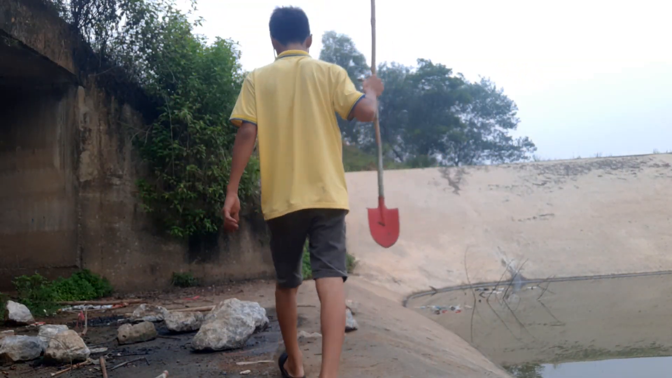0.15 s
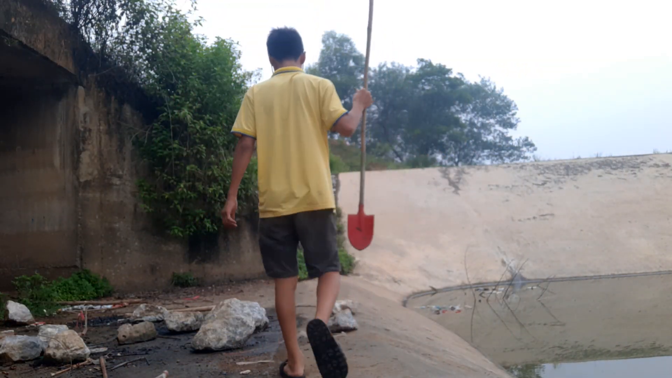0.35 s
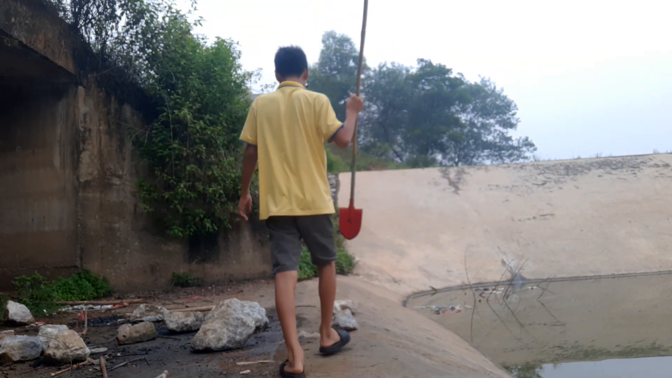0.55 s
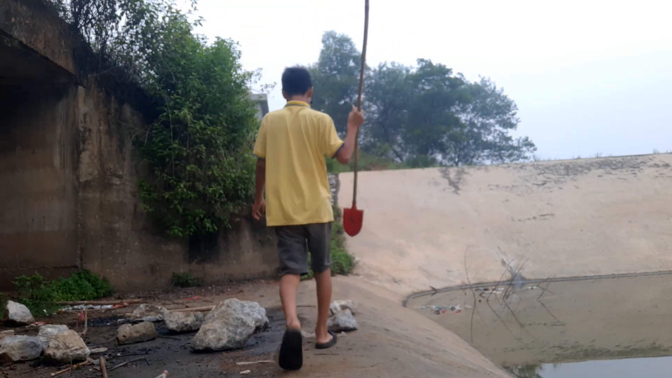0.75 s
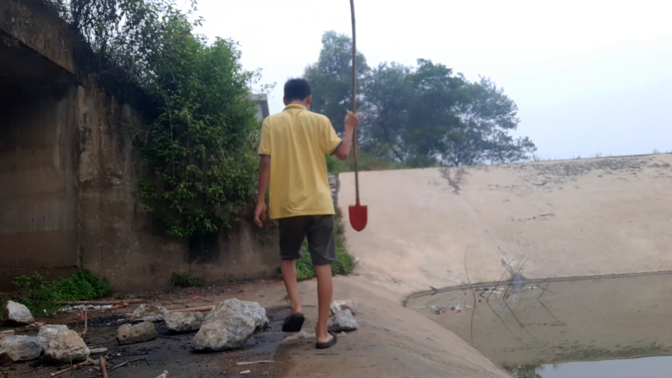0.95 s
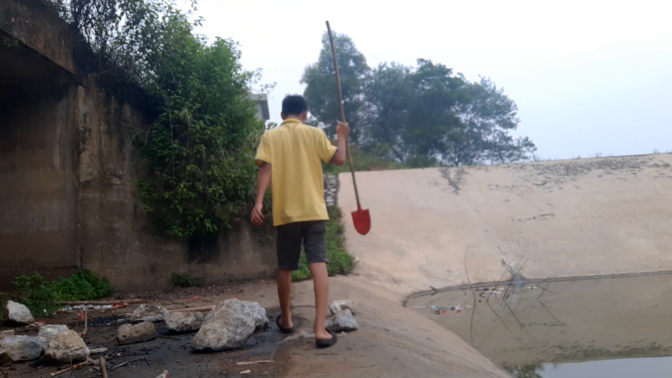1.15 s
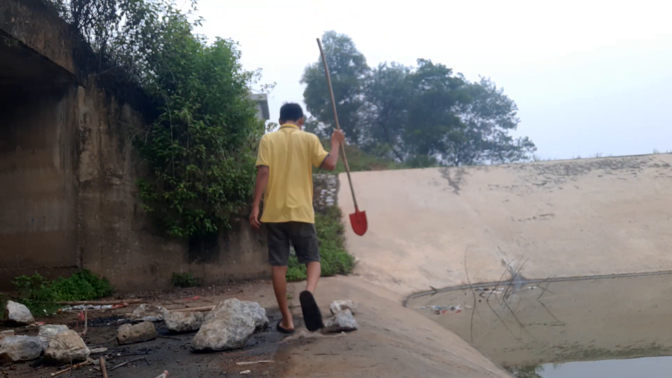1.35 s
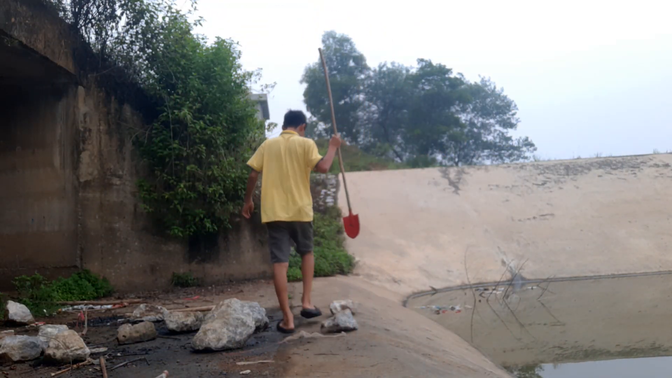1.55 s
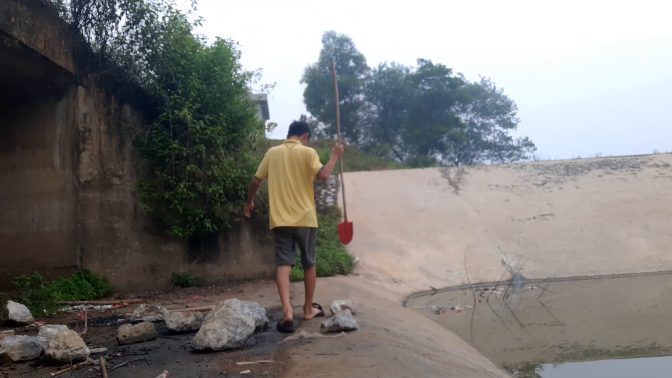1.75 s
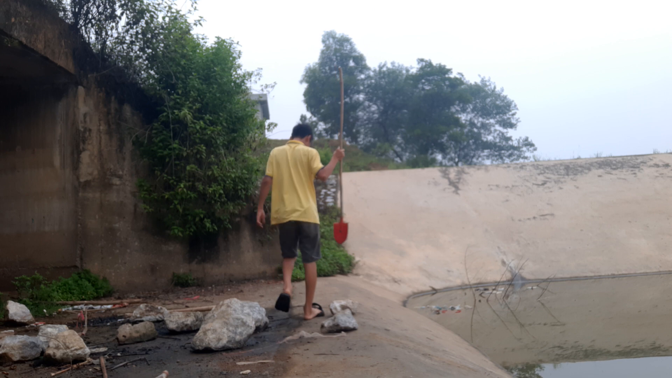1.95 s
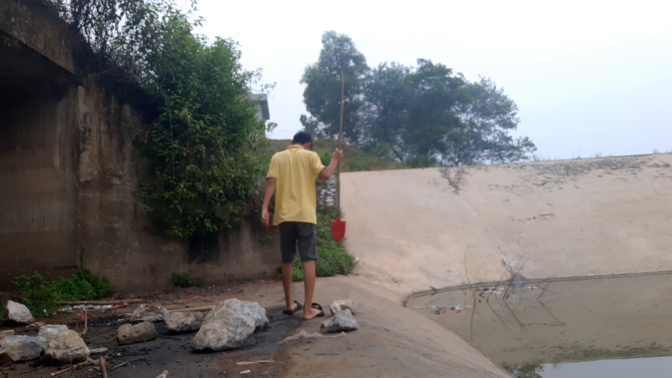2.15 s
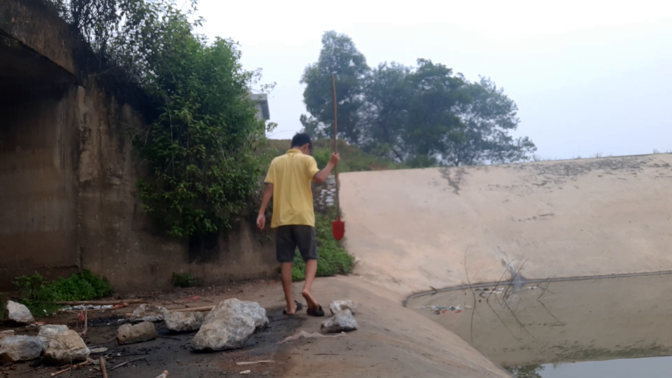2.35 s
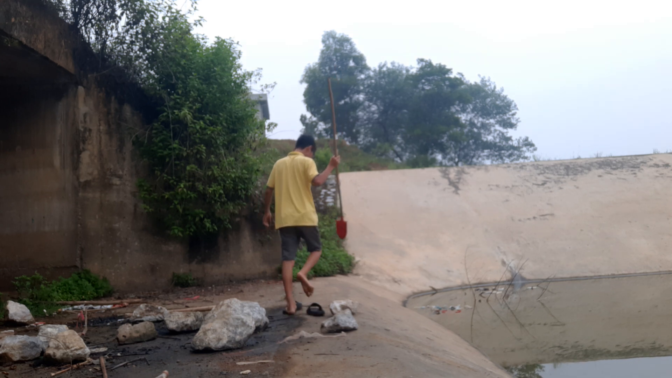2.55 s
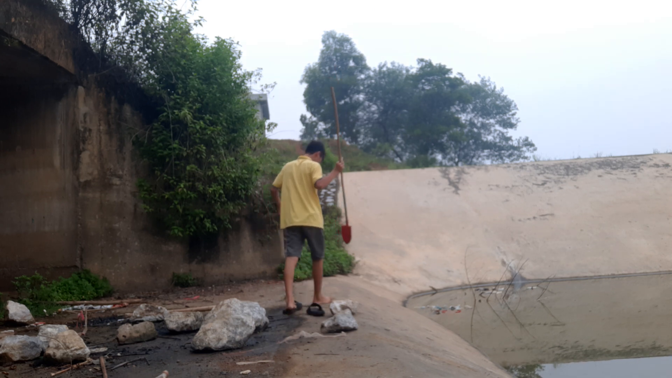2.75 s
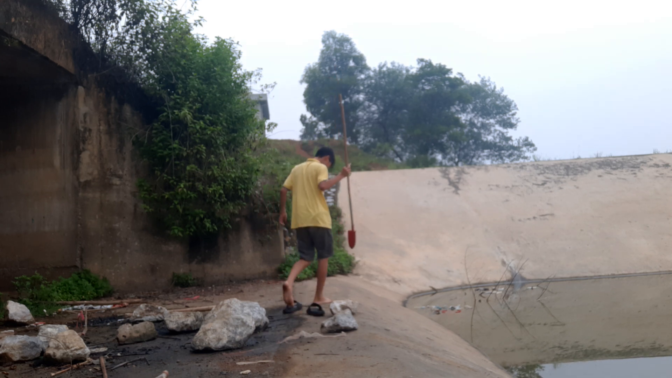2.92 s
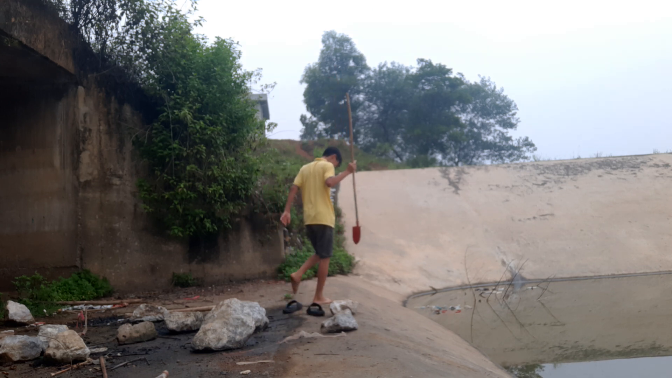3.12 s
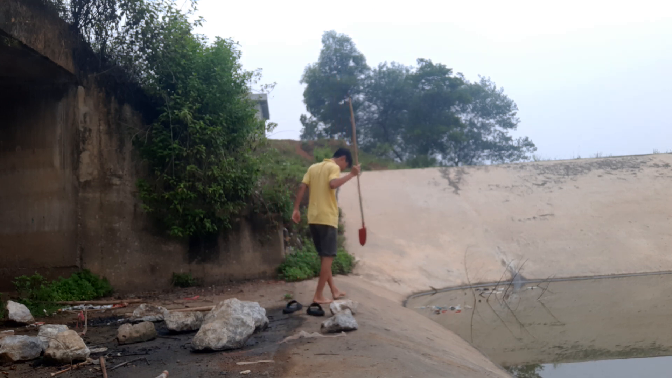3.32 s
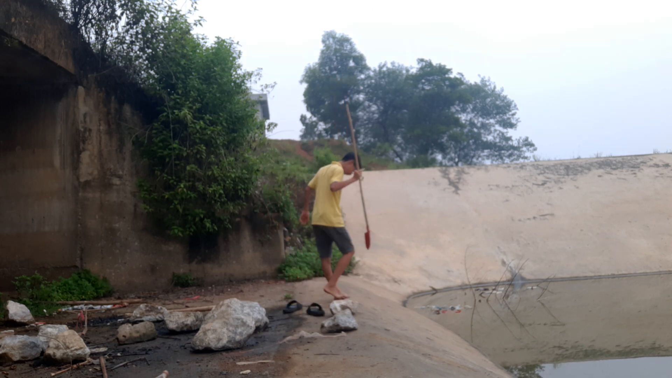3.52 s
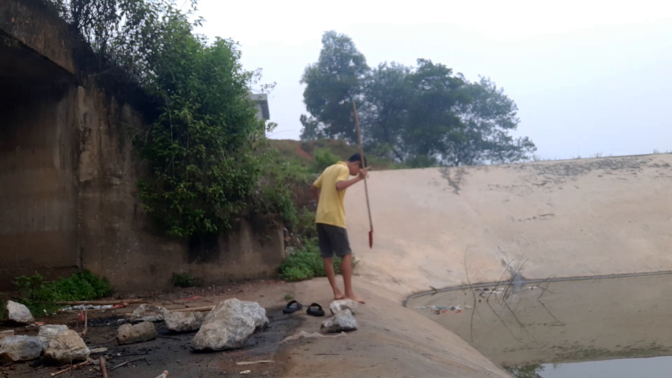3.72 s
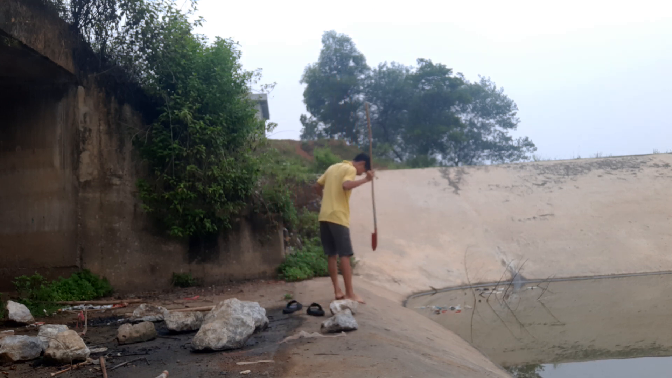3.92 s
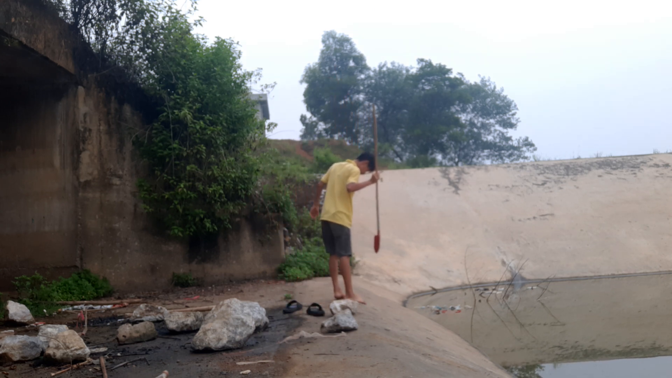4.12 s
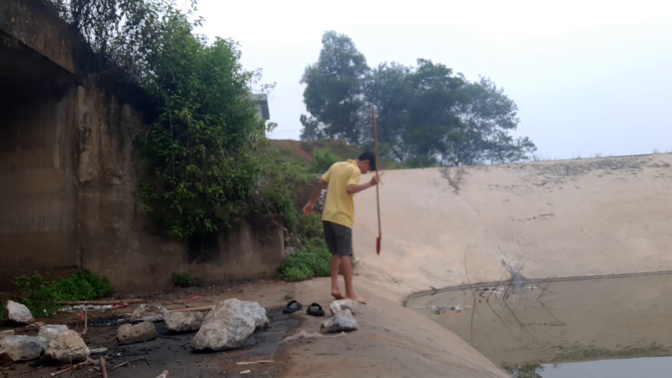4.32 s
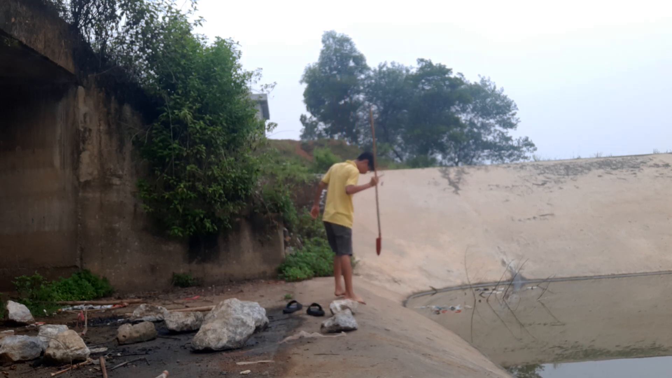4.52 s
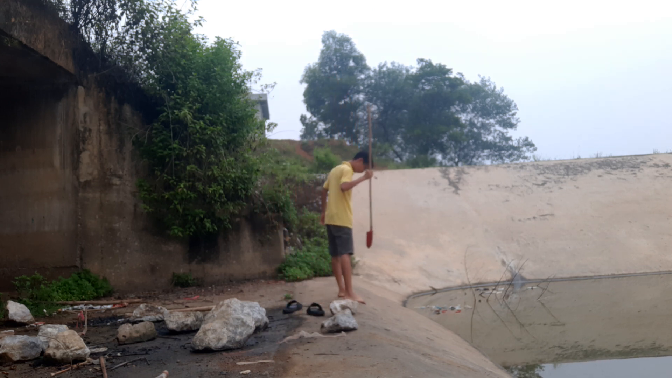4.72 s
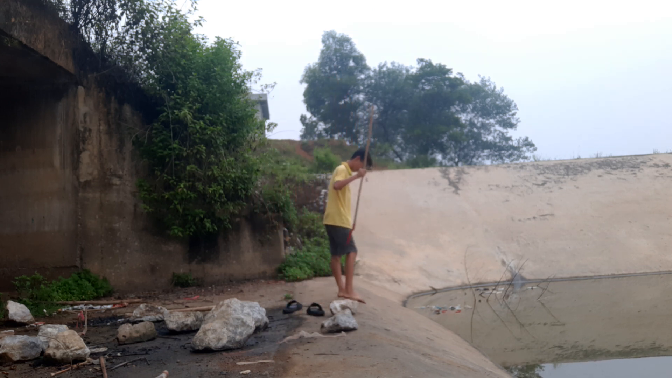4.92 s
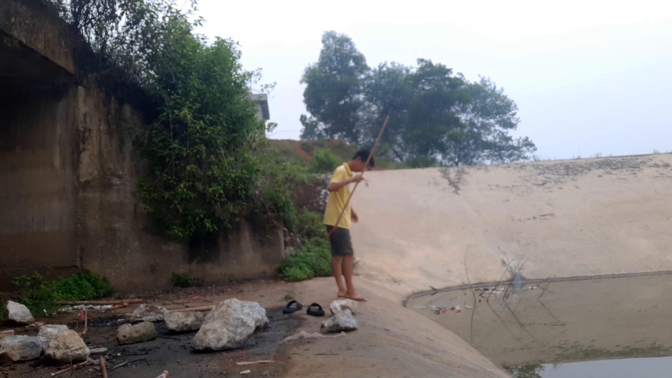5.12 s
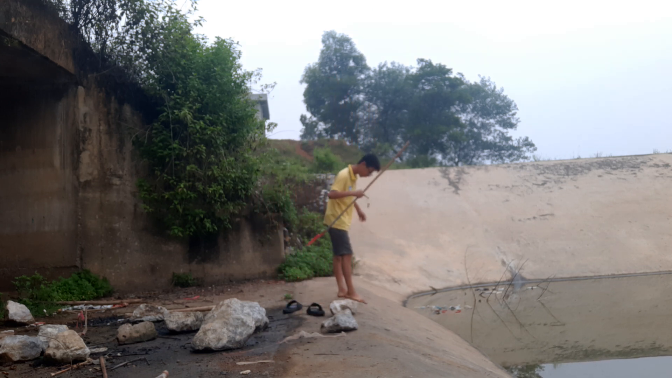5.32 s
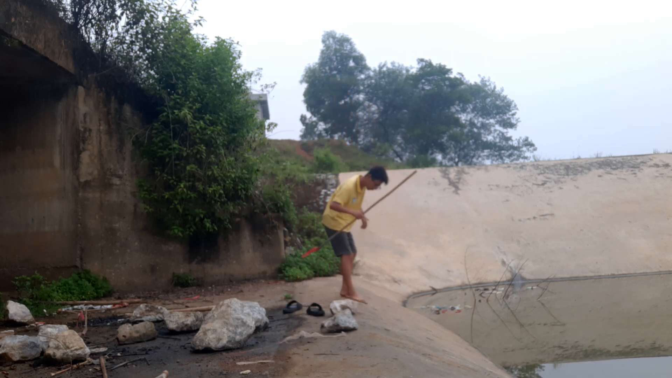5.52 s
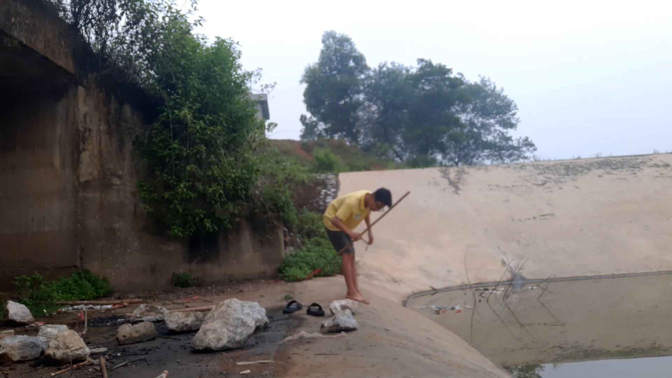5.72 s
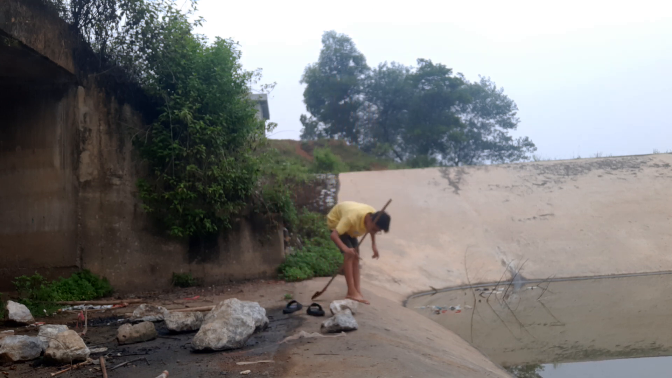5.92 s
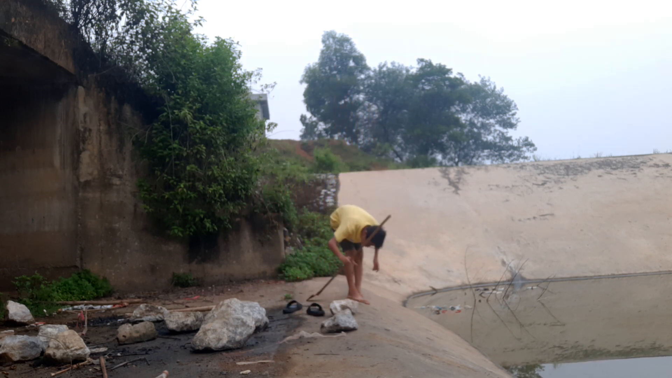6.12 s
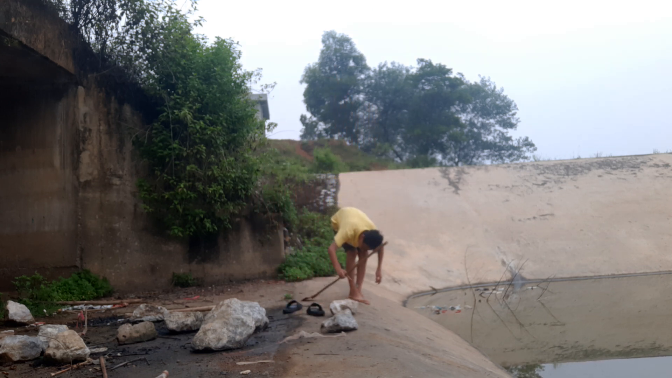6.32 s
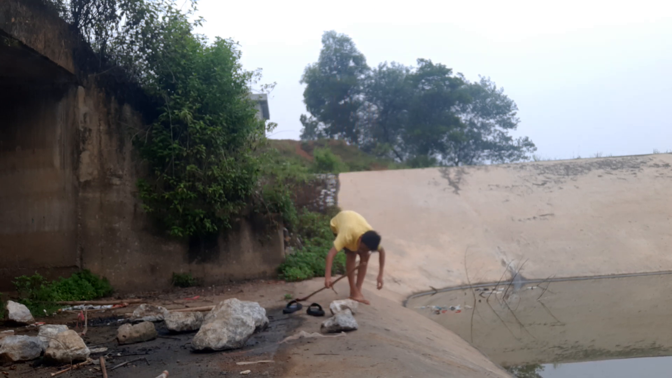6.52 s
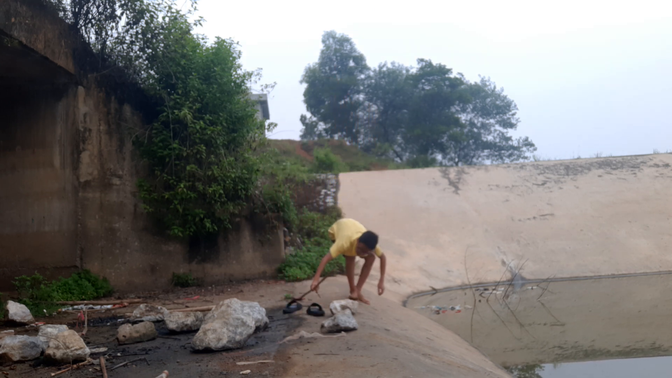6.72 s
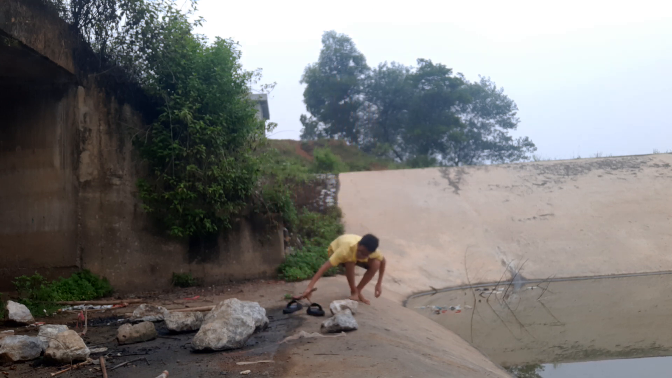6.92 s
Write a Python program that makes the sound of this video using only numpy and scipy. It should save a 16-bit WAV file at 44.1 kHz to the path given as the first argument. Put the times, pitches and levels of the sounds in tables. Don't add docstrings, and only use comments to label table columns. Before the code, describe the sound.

Stereo phone pickup with slightly mismatched sides and light hiss. Close gritty sandal steps come first, with pebble clicks, slaps and soft heel thumps, under clear descending bird whistles and steady cricket chirps. A quieter stretch follows, broken by a single hollow wood knock with tiny bounces. Then a shovel blade strikes concrete and drags in harsh, bright, ringing strokes, with short echoes from wall and slope.

```python
import sys
import numpy as np
from scipy import signal
from scipy.io import wavfile
from scipy.ndimage import uniform_filter1d

SR = 44100
rng = np.random.default_rng(int(sys.argv[2]) if len(sys.argv) > 2 else 0)


def volts_from_decibels(level):
    exponent = np.asarray(level, float) / 20
    return 10 ** exponent


def unload_audio(sound):
    columns = np.transpose(np.atleast_2d(sound))
    steps = np.round(np.clip(columns, -1, 1) * 32767)
    wavfile.write(sys.argv[1], SR, steps.astype(np.int16))


N = 311787


def evened(x):
    return x / np.sqrt(np.mean(x ** 2) + 1e-20)


def add(mix, start_s, sound):
    part = mix[round(start_s * SR):][:len(sound)]
    part += sound[:len(part)]


def lumps(count, hz, depth_db):
    drift = signal.lfilter([1], [1, -np.exp(-2 * np.pi * hz / SR)], rng.standard_normal(count))
    return volts_from_decibels(depth_db * evened(drift))


def ring(x, modes, widen=1, wander_db=0):
    out = np.zeros(len(x))
    for k, (hz, width_hz, db) in enumerate(modes):
        r = np.exp(-np.pi * width_hz * widen / SR)
        turn = 2 * np.pi * hz / SR
        drive = x * evened(lumps(len(x), 7.8, wander_db)) if wander_db else x
        mode = signal.lfilter([1 - r, 0, r - 1], [1, -2 * r * np.cos(turn), r * r], drive)
        out += (-1) ** k * volts_from_decibels(db) * mode
    return out


def grit(count, per_s, spread_db, smooth):
    size = volts_from_decibels(spread_db * np.minimum(rng.exponential(1, count), 4)) * rng.choice([-1, 1], count)
    snaps = size * (rng.random(count) < per_s / SR)
    return evened(snaps) + smooth * rng.standard_normal(count)


def swell(t, peak_s, rise_s, fall_s):
    away = np.where(t < peak_s, (peak_s - t) / rise_s, (t - peak_s) / fall_s)
    return volts_from_decibels(-23 * away ** 1.484)


def taps(rows, modes, t60):
    out, t = np.zeros(N), np.arange(3000) / SR
    for (s, db), puff in zip(rows, rng.standard_normal((len(rows), 3000))):
        tap = ring(ring(puff * volts_from_decibels(-60 * t / t60), modes), modes)
        add(out, s - .001, volts_from_decibels(db) * tap / abs(tap).max())
    return out


def pings(rows, t60):
    out, t = np.zeros(N), np.arange(8000) / SR
    for (s, hz, db), turn in zip(rows, rng.random((len(rows), 1))):
        rise = np.minimum(t / 0.0011, 1)
        add(out, s, volts_from_decibels(db - 60 * t / t60) * rise * np.sin(2 * np.pi * (hz * t + turn)))
    return out


def wash(points, same, patchy_db):
    hz, (f, db) = np.fft.rfftfreq(1024, 1 / SR), np.transpose(points)
    a, b, c, d, patches = rng.standard_normal((N // 256 + 5, 513, 5)).T
    patches = evened(uniform_filter1d(uniform_filter1d(patches, 10, 0), 12, 1))
    left, other = a + 1j * b, c + 1j * d
    z = np.array([left, same * left + np.sqrt(1 - same ** 2) * other])
    colour_db = np.interp(np.log(hz + 1), np.log(f), db, -60, -60)[:, None]
    z *= volts_from_decibels(colour_db + patchy_db * patches)
    return evened(signal.istft(z, nperseg=1024, noverlap=768)[1][:, :N])


def yard(x, t60, gap_s):
    t = np.arange(SR // 2) / SR
    echoes = rng.choice([-1, 1], (2, len(t))) * (rng.random((2, len(t))) < 2500 / SR)
    echoes = echoes * volts_from_decibels(-60 * t / t60) * (t > gap_s)
    echoes = echoes[:, :round(1.2 * t60 * SR)]
    echoes = echoes / np.linalg.norm(echoes, axis=1)[:, None]
    return signal.oaconvolve(x[None], echoes, axes=1)[:, :N]


def scatter(x, t60, turn_s):
    phase = np.pi * np.arange(N) / SR / turn_s
    return sum(yard(x * np.cos(phase + k * np.pi / 5) ** 4, t60, gap_s=.0002) for k in range(5))


# time_s, rumble_db, tone_db
ENGINE = [(0, -55.5, -55), (1, -61.5, -58), (2.3, -61, -65.5), (3.5, -64.5, -63), (5.5, -63, -64.5),
          (6.4, -57, -56), (7.07, -61.5, -66.5)]
# pitch_hz, level_db (per Hz)
RUMBLE = [(15, -63), (25, -71), (54, -43), (92, 0.5), (123, 8), (151, -28.5), (224, -5.5), (261, -25),
          (305, -16), (555, -37.5), (1500, -41), (1950, -116), (3300, -120)]


def far_engine():
    t = np.arange(N) / SR
    time_s, *levels_db = np.transpose(ENGINE)
    rumble_db, tone_db = (np.interp(t, time_s, column) for column in levels_db)
    tones = np.zeros(N)
    for k, db in enumerate((-3, -1.5, -9), 1):
        tones += volts_from_decibels(db) * lumps(N, hz=1.44, depth_db=4.0) * np.sin(2 * np.pi * k * 122.5 / 2 * t)
    engine = volts_from_decibels(rumble_db) * wash(RUMBLE, same=0.84, patchy_db=2.5) + volts_from_decibels(tone_db) * tones
    return engine * volts_from_decibels([[.3], [-.3]])


# pitch_hz, level_db (per Hz)
CHORUS = [(2900, -21), (3450, -10.5), (4050, -11.5), (4600, -1.5), (5300, -7), (5750, -14), (6300, -8.5),
          (6800, -13), (7400, -30), (8500, -11), (9000, 2), (9600, -8.5), (10500, -1), (11500, -14),
          (12500, -15.5)]
# time_s, level_db
CHORUS_LEVEL = [(0, -64.5), (2.5, -66), (4.5, -66.5), (7.07, -68.5)]
# pitch_hz, width_hz, level_db
THIN_INSECT = [(3450, 110, 0)]
# time_s, level_db
THIN_INSECT_LEVEL = [(0, -95), (4.4, -88), (4.9, -86), (5.5, -87), (7.07, -88)]


def insect_chorus():
    t = np.arange(N) / SR
    chorus = volts_from_decibels(np.interp(t, *np.transpose(CHORUS_LEVEL))) * wash(CHORUS, same=0.013, patchy_db=1.5)
    thin = evened(ring(ring(rng.standard_normal(N), THIN_INSECT), THIN_INSECT))
    chorus = chorus + volts_from_decibels(np.interp(t, *np.transpose(THIN_INSECT_LEVEL))) * thin
    return chorus * volts_from_decibels([[-2.5], [2.5]])


# first_s, last_s, peak_db
BOUTS = [(0.046, 1.03, -61), (1.422, 1.8, -61.5), (1.949, 2.83, -69), (2.355, 2.99, -60), (3.27, 3.27, -66),
         (3.31, 3.7, -61), (3.905, 4.668, -59.5), (4.9, 4.9, -75), (5.694, 5.695, -61.5)]


def cricket():
    t, chirps = np.arange(0, .03, 1 / SR), np.zeros(N)
    strokes = np.sin(np.pi * t / .03) * np.sin(np.pi * 125 * t) ** 4
    wing = [(6084, 95, 2.5), (6560, 450, -9.5)]  # pitch_hz, width_hz, level_db
    for first, last, db in BOUTS:
        count = round((last - first) / .12) + 1
        for s in np.linspace(first, last, count):
            chirp = ring(strokes * rng.standard_normal(2000)[:len(t)], wing)
            add(chirps, s - .008, volts_from_decibels(db + 2.0 * rng.standard_normal()) * chirp / abs(chirp).max())
    return (2.0 * chirps + .5 * yard(chirps, t60=0.092, gap_s=0.0036)) * volts_from_decibels([[-3.5], [1.5]])


# peak_s, rise_s, fall_s, grit_db, rasp_db (above the grit)
SCUFFS = [(.165, 0.024, 0.071, -39.5, -5), (0.22, 0.043, 0.015, -46, -3.5), (0.301, 0.073, 0.034, -44, -7),
          (0.419, 0.018, 0.27, -63.5, -4.5), (0.459, 0.03, 0.065, -65, -11), (.715, 0.033, 0.093, -53, -6),
          (0.789, 0.046, 0.055, -53.5, -8), (1.245, 0.034, 0.11, -57, -5), (1.30, 0.027, 0.1, -54.5, -5.5),
          (1.355, 0.026, 0.043, -54.5, -6), (1.71, .015, 0.04, -43, -6.5), (1.755, 0.022, 0.046, -43, 1.5),
          (2.181, 0.0094, 0.066, -56, -8.5), (2.245, .012, 0.023, -51, 3), (2.265, 0.0097, 0.013, -62, 10),
          (2.424, 0.064, 0.1, -63, -2.5), (4.348, 0.009, 0.12, -59.5, 0.5)]
# pitch_hz, width_hz, level_db
SOLE = [(259, 336, 0.01), (1260, 1400, 0.0362)]
RASP = [(2690, 940, 0)]
GRIT = [(6000, 650, -15), (10800, 44000, 5.5)]
# start_s, peak_db, brightness_db, pitch_hz
PEBBLES = [(0.0737, -38, -10, 4840), (0.1486, -46, 6, 3770), (0.1593, -41, 15, 3500),
           (0.161, -46, 18, 3500), (0.1657, -41, 14, 3150), (0.167, -36.5, 20.5, 3300),
           (0.1725, -37.5, 17.5, 3000), (0.2250, -40, 13, 3000), (0.2352, -37, -7, 3500),
           (0.2400, -54, -1, 4000), (0.2815, -37, -6, 5500), (0.2985, -45, 9, 3470),
           (0.306, -39, -10, 3200), (0.3400, -46, 2, 4500), (0.2307, -29.5, -4, 3000),
           (0.257, -41, -19, 3700), (0.295, -44, -10, 3460), (0.334, -55, 12, 5500),
           (0.333, -27.5, -14, 5560), (0.415, -38.5, -4, 4100), (0.423, -35, -9, 4820),
           (0.4662, -40, -6, 3660), (0.6015, -43.5, -3, 5000), (0.678, -40, -11, 3530),
           (0.7024, -32, -9, 4000), (0.7243, -31, -6.5, 3760), (0.78, -40, -10, 4340),
           (0.7968, -40, -2, 3500), (1.2237, -42.5, -1, 3700), (1.28, -48, 4, 2570),
           (1.347, -33.5, -7, 3600), (1.357, -32, -3, 3900), (1.363, -36, -6, 4200), (1.65, -26, -23, 5100),
           (1.708, -44, -1, 3770), (1.7464, -44, -6, 2990), (1.7625, -24, -11, 4270),
           (1.7680, -34, -13, 4500), (1.831, -41, -6, 3510), (1.9257, -55.5, 17, 4200),
           (2.1126, -44, -24, 5460), (2.1818, -37, -4, 3670), (2.1889, -37, -1, 4000),
           (2.24, -35, -8, 2700), (3.9303, -32, -10, 4000), (3.9306, -34, -18, 6200),
           (5.7867, -47, -13, 4700)]
# start_s, peak_db
SLAPS = [(0.073, -67), (0.169, -35), (0.1874, -36), (0.2266, -38), (0.4648, -61), (0.5608, -59),
         (0.6669, -66), (0.7467, -54.5), (0.7983, -44), (1.163, -63), (1.2212, -60), (1.26, -59),
         (1.508, -67.5), (1.745, -47), (1.7644, -42), (1.9068, -54.5), (1.9573, -56.5), (2.2416, -46),
         (2.692, -68.5), (2.8469, -68), (3.0587, -61), (3.7, -67), (4.0801, -69), (5.7862, -61),
         (5.806, -68)]
# start_s, peak_db
HEELS = [(0.072, -69), (0.186, -36.5), (0.382, -44.5), (0.778, -54), (0.871, -47.5), (1.41, -54),
         (1.704, -43.5), (1.778, -38.5), (1.955, -50), (2.178, -45), (2.24, -48), (2.848, -60),
         (3.689, -64), (4.08, -65), (4.717, -58), (4.771, -55), (5.789, -53), (5.972, -40), (5.988, -37)]


def sandals():
    out, t = np.zeros(N), np.arange(SR // 2) / SR
    for peak_s, rise_s, fall_s, db, rasp_db in SCUFFS:
        s = max(peak_s - 2 * rise_s, 0)
        rub = grit(len(t), per_s=4500, spread_db=2.5, smooth=.45)
        rub = rub * lumps(len(t), hz=70.5, depth_db=3.0)
        rasp = evened(ring(rub, RASP)) + volts_from_decibels(-10.0) * evened(ring(rub, SOLE))
        body = evened(ring(rub, GRIT)) + volts_from_decibels(rasp_db + 6.0) * rasp
        add(out, s, volts_from_decibels(db + 4.5) * swell(t + s, peak_s, rise_s, fall_s) * body)
    for s, db, bright_db, hz in PEBBLES:
        out += volts_from_decibels(3.0) * taps([(s, db)], [(hz, 0.79 * hz, 0)], t60=0.0059)
    sparks = taps([(s, db + bright_db) for s, db, bright_db, _ in PEBBLES], GRIT, t60=0.0033)
    slaps = taps(SLAPS, SOLE[1:], t60=0.061)
    heels = taps(HEELS, SOLE[:1], t60=0.1)
    return out + volts_from_decibels(12) * sparks + volts_from_decibels(9.5) * slaps + volts_from_decibels(3.5) * heels


def whistles(rows, falls, linger, blurred, settle=.7):
    out = np.zeros(N)
    rustles = rng.standard_normal((len(rows), SR // 2))
    for (s, length_s, start_hz, db), fall, rustle in zip(rows, np.broadcast_to(falls, len(rows)), rustles):
        u = np.arange(0, 1, 1 / (length_s * SR))
        glide = np.sin(np.pi / 2 * np.minimum(u / settle, 1)) ** (1 + linger)
        hz = start_hz * (1 + (fall - 1) * glide)
        blur = evened(uniform_filter1d(rustle[:len(u)], size=64))
        tone = volts_from_decibels(db + 1.5) * np.sin(2 * np.pi * np.cumsum(hz) / SR) * np.sin(np.pi * u ** .5) ** .7
        add(out, s, tone * volts_from_decibels(-4 * u / fall) * (1 - blurred + blurred * blur))
    return out


# start_s, length_s, pitch_hz (at the start), level_db
SLURS = [(.612, 0.16, 3770, -56.5), (1.193, 0.14, 4000, -52.5), (1.712, 0.13, 3900, -52),
         (2.266, 0.13, 3900, -49.5)]
SLUR_FALLS = (.56, .645, .66, .6)
# start_s, length_s, pitch_hz, level_db
DARTS = [(1.045, 0.051, 6000, -55), (1.582, 0.026, 5940, -53.5), (2.108, .05, 6440, -53)]
# start_s, length_s, pitch_hz, level_db
PIPES = [(1.19, 0.082, 5300, -69), (1.37, 0.14, 5740, -57.5), (3.037, 0.18, 5300, -54)]
TRILL_S = [4.719, 4.76, 4.889, 4.926, 4.961, 5.088, 5.129, 5.169]
# start_s, level_db
FAR_LOW = [(0.839, -63), (2.671, -66.5), (3.138, -69.5), (3.64, -69.5), (4.072, -70.5), (4.551, -66)]
# start_s, pitch_hz, level_db
FAR_HIGH = [(1.099, 6560, -54), (1.779, 5580, -62.5), (2.351, 6340, -60), (2.63, 6750, -58.5),
            (2.89, 3320, -69), (2.93, 3700, -73), (2.98, 6880, -55.5), (3.627, 6170, -60.5),
            (3.979, 6000, -63.5), (4.401, 5910, -61), (4.47, 6790, -61), (5.26, 6000, -67),
            (5.299, 6310, -60.5), (5.428, 6310, -62), (5.898, 6210, -62)]


def birds():
    trill = [(s, .03, 5450, -66) for s in TRILL_S]
    near = whistles(SLURS, SLUR_FALLS, linger=1.2, blurred=.27)
    near += whistles(PIPES + trill, .835, linger=0, blurred=.35, settle=1.4)
    near += whistles(DARTS, 0.46, linger=.6, blurred=.7)
    low_notes = [(s, 0.11, 3900, db) for s, db in FAR_LOW]
    high_notes = [(s, 0.19, hz, db) for s, hz, db in FAR_HIGH]
    far = whistles(low_notes, 0.82, linger=0.26, blurred=0.99)
    far += whistles(high_notes, 0.72, linger=0.1976, blurred=0.37)
    echo = yard(1.26 * far + .55 * near, t60=0.35, gap_s=0)
    return (near + .15 * far + echo) * volts_from_decibels([[-2.5], [1.5]])


# start_s, peak_db, fade_s (time to fall 60 dB)
KNOCKS = [
    (4.334, -14, 0.045),
    (4.3798, -28, 0.011),
    (4.386, -28.5, 0.016),
    (4.403, -37, 0.012),
]
# pitch_hz, level_db, fade_s
WOOD = [(190.5, -13.5, .08), (305, -1, 0.14), (423, 1.5, 0.074), (500, -8, 0.084), (656, -6.5, 0.083),
        (968, -3, 0.064), (1240, 11.5, 0.022), (1390, -3, 0.036), (1740, -17, 0.05), (2390, -20, 0.052),
        (3740, -8.5, 0.048)]
# pitch_hz, width_hz, level_db
THUD = [(675, 990, 0)]
# pitch_hz, width_hz, level_db
CULVERT = [(428, 200, 0)]


def knock():
    out, t = np.zeros(N), np.arange(8000) / SR
    for k, (s, db, t60) in enumerate(KNOCKS):
        modes = np.zeros(len(t))
        for hz, mode_db, ring_s in WOOD:
            dull_db = -11 * np.log2(hz / WOOD[1][0]) * (k > 0)
            tone = np.sin(2 * np.pi * (hz * t + rng.random()))
            modes += volts_from_decibels(mode_db + dull_db - 60 * t / ring_s) * tone
        blow = rng.standard_normal(len(t)) * volts_from_decibels(-60 * t / t60) * np.minimum(t / 0.013, 1)
        thud = evened(ring(ring(blow, THUD), THUD))
        body = evened(modes * np.minimum(t / 0.0025, 1) ** 2) + 0.35 * thud
        crack = ring(rng.standard_normal(len(t)) * volts_from_decibels(-60 * t / (1.1 * t60)), GRIT)
        crack = np.diff(crack, 2, prepend=[0, 0])
        add(out, s - .001 + 0.0017, volts_from_decibels(db) * body / abs(body).max())
        add(out, s - .0015, volts_from_decibels(db + 4.5) * crack / abs(crack).max())
    t = np.arange(SR) / SR
    hum = evened(ring(ring(rng.standard_normal(SR), CULVERT), CULVERT))
    knock_s = KNOCKS[0][0]
    add(out, knock_s, volts_from_decibels(-61 - 60 * t / 2.5) * hum)
    return out + pings([(knock_s + 0.002, 3740, -29), (knock_s, 5200, -32)], t60=0.036)


# peak_s, rise_s, fall_s, pressure_db, flatness (0 on edge, 1 flat)
DRAG = [
    (5.972, 0.0027, 0.095, -44, 0.46),
    (6.059, 0.0031, 0.29, -31.5, 0.13),
    (6.354, 0.19, 0.24, -26, 0.027),
    (6.52, 0.34, 0.076, -28.5, 0.033),
    (6.598, 0.021, 0.043, -47.5, 1),
    (6.659, 0.0075, 0.075, -48.5, 0.57),
    (6.712, 0.0043, 0.17, -30.5, 0.12),
    (6.824, 0.022, 0.13, -35.5, 0.25),
    (6.885, 0.008, 0.18, -35, 0.16),
]
# start_s, peak_db, flatness (0 to 1)
STRIKES = [(5.9684, -21.5, 0.67), (5.9868, -22.5, 0.48), (5.978, -24.5, 0.43), (5.995, -27, 0.58),
           (6.058, -29, 0), (6.078, -52, 0), (6.1359, -28.5, 0), (6.4194, -30, 0.44), (6.516, -26, 0.24),
           (6.5517, -32.5, 0.87), (6.5982, -36.5, 0.8), (6.6179, -35.5, 0.7), (6.6572, -35.5, 0.34),
           (6.7126, -28.5, 0.46), (6.78, -32, 0.7), (6.8077, -30, 0.3), (6.8798, -31, 0), (6.903, -34, 0)]
# pitch_hz, width_hz, level_db
BLADE_LOW = [(390, 30, -7), (592, 40, -10), (845, 30, -7), (700, 600, -15), (1130, 50, -4), (1280, 70, -3),
             (1400, 60, -7), (1532, 30, -8), (1700, 36, -14)]
BLADE_HIGH = [(6230, 70, -6), (6600, 80, -7), (7690, 80, -3), (9334, 40, -3.5), (10001, 45, -3),
              (10276, 40, -2), (10581, 35, -4), (11170, 45, 0), (11388, 45, -5), (11684, 40, -1),
              (12195, 80, -3), (13300, 84, 0), (14300, 110, -8)]
# pitch_hz, width_hz, level_db
MID_HZ = (1860, 2000, 2270, 2510, 2830, 3037, 3300, 3730, 4220, 4535, 4765, 5280, 5530, 5960)
MID_WIDTH_HZ = (32, 32, 50, 50, 24, 24, 90, 40, 40, 40, 32, 45, 55, 75)
MID_DB = (3.5, 0.5, 2.5, 2.5, 3, 7, 3, 2, -2.5, 2, -0.5, 0, -3, -5)
# pitch_hz, width_hz, level_db
BELL = [(392, 30, -3), (1270, 24, -7), (1850, 22, -8), (2835, 13, 4), (3037, 13, 4), (3730, 24, -12),
        (4770, 26, -12)]
# low_db, mid_db, high_db
RUB_EDGE_DB = (-11.5, -4, 3.5)
RUB_FLAT_DB = (16, -7, 7.5)
STRIKE_EDGE_DB = (-24, 0, 8)
STRIKE_FLAT_DB = (7, 0, -7)


def lean(flat, edge_db, flat_db):
    return volts_from_decibels(np.add(edge_db, flat * np.subtract(flat_db, edge_db)))[:, None]


def shovel():
    s = DRAG[0][0] - .02
    t = np.arange(s, N / SR, 1 / SR)
    power = 0
    for *shape, db, flat in DRAG:
        power = power + (volts_from_decibels(db) * swell(t, *shape) * lean(flat, RUB_EDGE_DB, RUB_FLAT_DB)) ** 2
    rub = grit(len(t), per_s=3300, spread_db=6, smooth=1.0) * lumps(len(t), hz=31, depth_db=0.5)
    drive = evened(rub) * np.sqrt(power) * volts_from_decibels(0.5)

    t, struck = np.arange(3000) / SR, np.zeros(N)
    for at, hit_db, flat in STRIKES:
        puff = rng.standard_normal(len(t)) * volts_from_decibels(hit_db + 1.4 - 60 * t / 0.057)
        for row, gain in zip(drive, lean(flat, STRIKE_EDGE_DB, STRIKE_FLAT_DB)):
            add(row, at - s - .001, gain * puff)
        add(struck, at, volts_from_decibels(hit_db - 60 * t / 0.0043) * rng.standard_normal(len(t)))
    out = volts_from_decibels(21) * ring(struck, BELL) + volts_from_decibels(0.5) * ring(struck, GRIT)

    probe = rng.standard_normal(8000)
    blade_mid = list(zip(MID_HZ, MID_WIDTH_HZ, MID_DB))
    layers = ((BLADE_LOW, 1080, 1480, 8, -4.5), (blade_mid, 1850, 6800, 60, .1),
              (BLADE_HIGH, 7000, 16000, 35, -6))
    for row, (modes, low_hz, high_hz, count, layer_db) in zip(drive, layers):
        crowd_hz = low_hz + (high_hz - low_hz) * (np.arange(count) + rng.random(count)) / count
        crowd = [(hz, 0.032 * hz + 20, 0) for hz in crowd_hz]
        for share, group, wander_db, widen in ((.76, modes, 1.5, .9), (.72, crowd, 1.2, 1.1)):
            rung = ring(row, group, widen, wander_db) / ring(probe, group, widen).std()
            add(out, s, share * volts_from_decibels(layer_db) * rung)
    return out


# start_s, pitch_hz, peak_db
PINGS = [(5.970, 3010, -31), (5.987, 4730, -30), (5.987, 1263, -28), (6.058, 5030, -29), (6.059, 3830, -41),
         (6.060, 2050, -40), (6.092, 2740, -33), (6.110, 2850, -34), (6.136, 2774, -31.5),
         (6.285, 2280, -30.5), (6.335, 3280, -32), (6.345, 1880, -38), (6.358, 5850, -38),
         (6.372, 1910, -38), (6.422, 3320, -29), (6.506, 3010, -23.5), (6.514, 4820, -25),
         (6.526, 3736, -28.5), (6.547, 3700, -30), (6.560, 4720, -37), (6.598, 2040, -29.5),
         (6.598, 1480, -36.5), (6.598, 886, -35), (6.617, 1997, -31.5), (6.617, 1092, -34.5),
         (6.658, 1230, -45), (6.658, 4200, -35.5), (6.713, 4554, -26), (6.720, 3080, -26),
         (6.752, 4790, -33), (6.780, 3790, -28.5), (6.810, 2554, -31), (6.810, 1670, -32),
         (6.822, 3300, -29.5), (6.858, 830, -38.5), (6.882, 3025, -32.5), (6.882, 2526, -30.5),
         (6.902, 2596, -31), (6.926, 2970, -39), (6.950, 3110, -42)]
# start_s, pitch_hz, peak_db
SINGING = [(5.985, 3037, -30), (5.985, 2835, -31), (5.99, 1270, -42), (5.99, 1852, -42), (5.99, 3730, -42),
           (5.99, 4770, -40), (6.06, 3037, -38), (6.14, 2800, -38), (6.34, 1855, -36), (6.37, 3730, -35),
           (6.40, 3037, -35), (6.51, 3037, -31), (6.60, 4770, -44), (6.60, 2010, -42), (6.72, 4560, -39),
           (6.72, 3037, -38), (6.75, 5250, -37), (6.785, 4790, -37), (6.80, 5300, -36), (6.82, 4540, -38),
           (6.83, 2530, -38), (6.885, 2540, -35), (6.905, 3037, -36), (6.93, 6250, -42), (6.95, 4560, -40),
           (6.95, 4950, -45), (1.775, 2650, -50)]


def blade_tones():
    return volts_from_decibels(3.5) * pings(PINGS, t60=0.071) + pings(SINGING, t60=.38)


def scene():
    feet, blade = sandals(), shovel()
    clear = knock() + blade_tones()
    ground = feet + blade + clear
    spread = volts_from_decibels(-4) * feet + volts_from_decibels(-2) * blade + volts_from_decibels(-4) * clear
    treble = spread - uniform_filter1d(spread, size=40)
    close = volts_from_decibels(-9) * scatter(treble, t60=.035, turn_s=.2)
    direct = np.array([ground, np.roll(ground, 2)])
    echo = volts_from_decibels(-17.0) * yard(ground, t60=0.3, gap_s=0.02)
    return 0.42 * direct + close + echo + birds() + cricket() + far_engine() + insect_chorus()


def roll_off(x):
    return signal.sosfilt(signal.butter(12, 16820, fs=SR, output="sos"), x)


# pitch_hz, left_db, right_db
PORTS = [(100.6, -1, -3.5), (980, 1, -0.5), (1910, -2, -1), (4000, 3, 4.5), (5500, 0, 7), (6500, -4.5, 8.5),
         (7770, -12, -12.5), (8630, -4.5, -9.5), (8240, -5, -40), (10190, 10.5, -19), (11330, 12.5, -10),
         (13600, 0.5, -11.5), (15200, 3, -18), (17000, -22, -27)]


def record(dry):
    hz, (f, *ports) = np.fft.rfftfreq(512, 1 / SR), np.transpose(PORTS)
    logs = np.log(volts_from_decibels([np.interp(hz, f, db) for db in ports]))
    mirrored = np.c_[logs, logs[:, -2:0:-1]]
    cavity = np.fft.ifft(np.exp(signal.hilbert(mirrored).conj())).real
    x = signal.oaconvolve(dry, cavity, axes=1)[:, :N]
    x = x + volts_from_decibels(-72) * rng.standard_normal(dry.shape)
    x = signal.oaconvolve(x, signal.firwin(1023, 16000, fs=SR)[None], "same")
    x = signal.sosfilt(signal.butter(2, 36, "high", fs=SR, output="sos"), x)
    return roll_off(x)


dry = scene()
out = record(dry)
unload_audio(out)
```